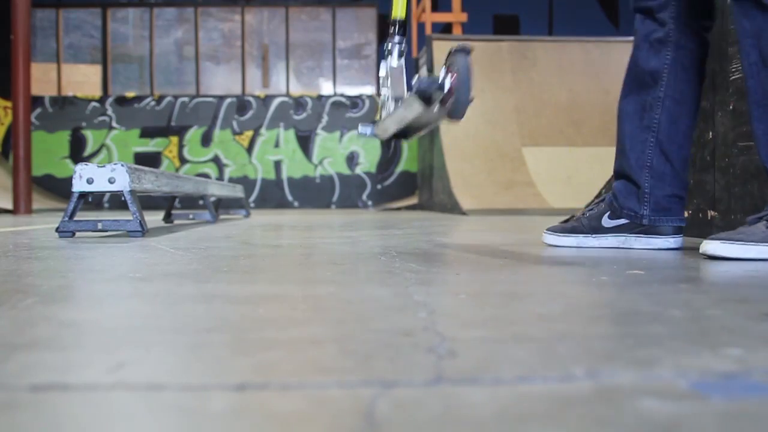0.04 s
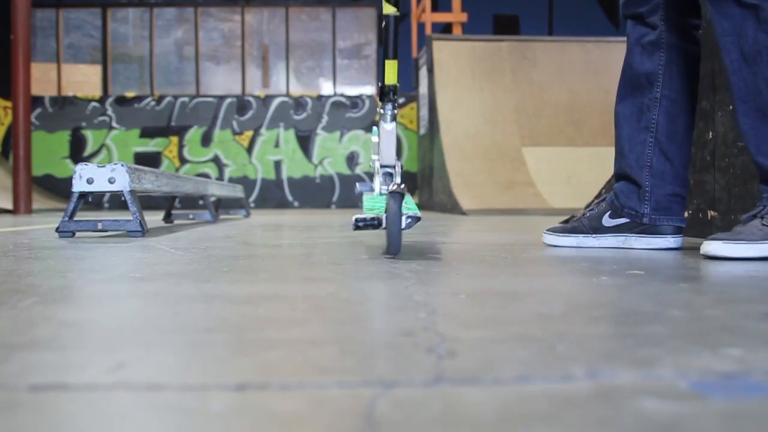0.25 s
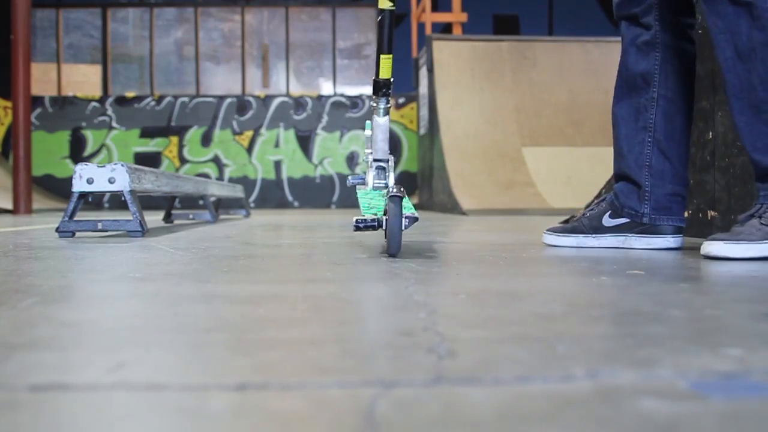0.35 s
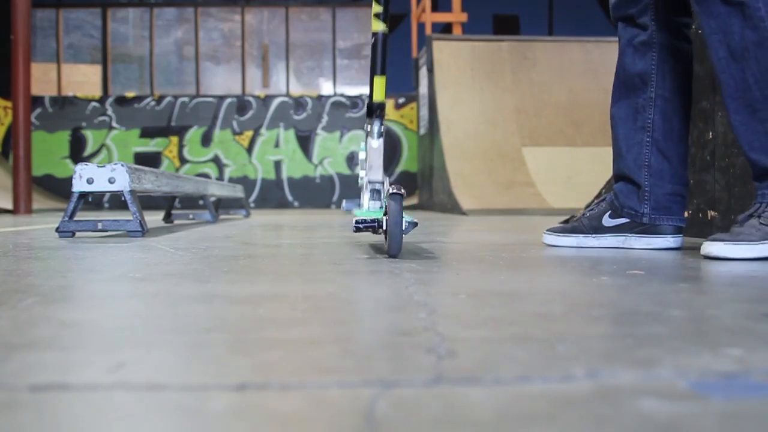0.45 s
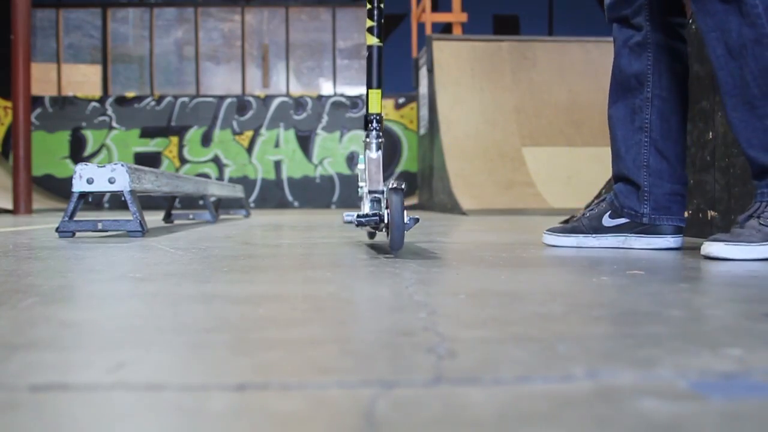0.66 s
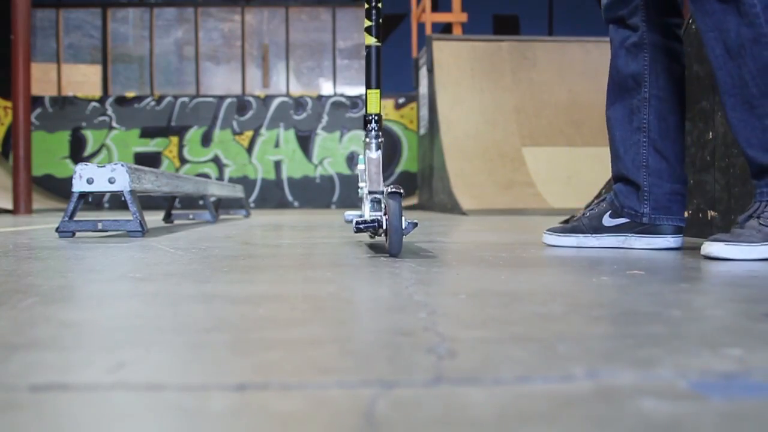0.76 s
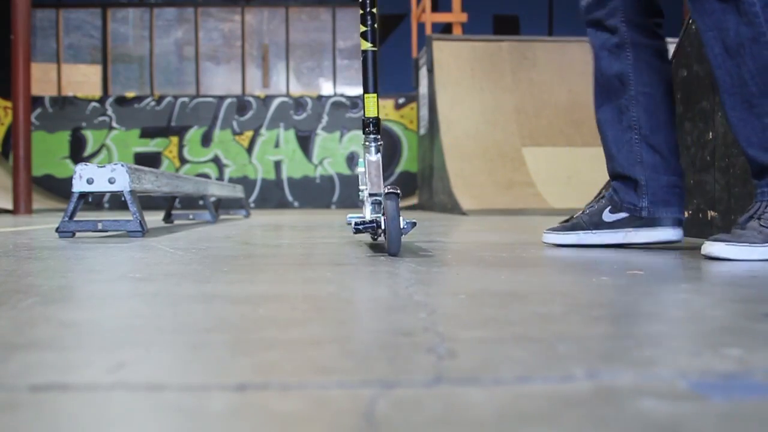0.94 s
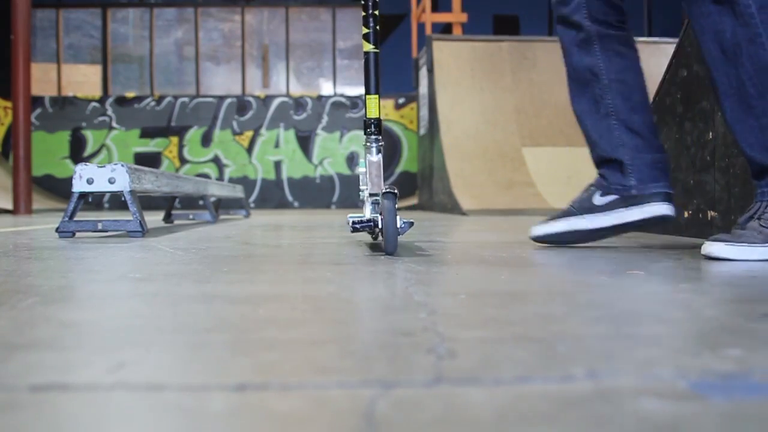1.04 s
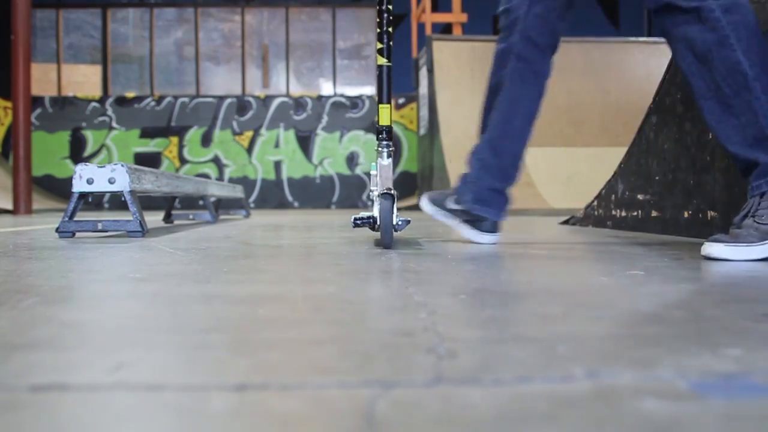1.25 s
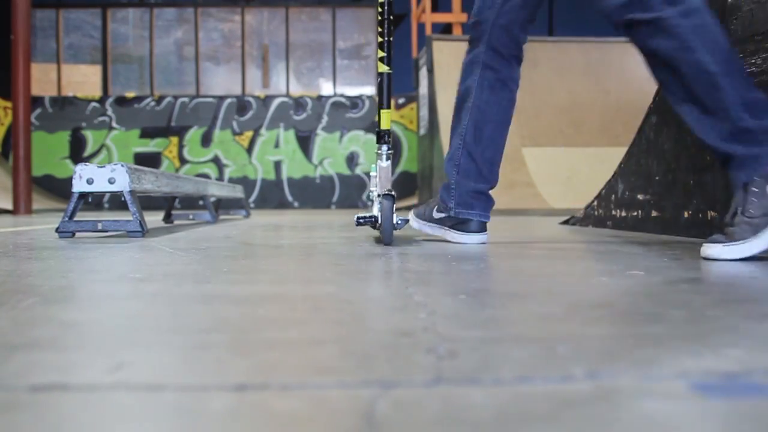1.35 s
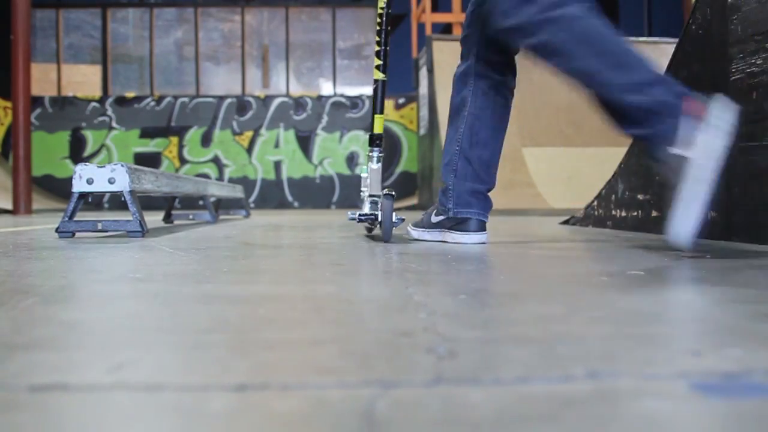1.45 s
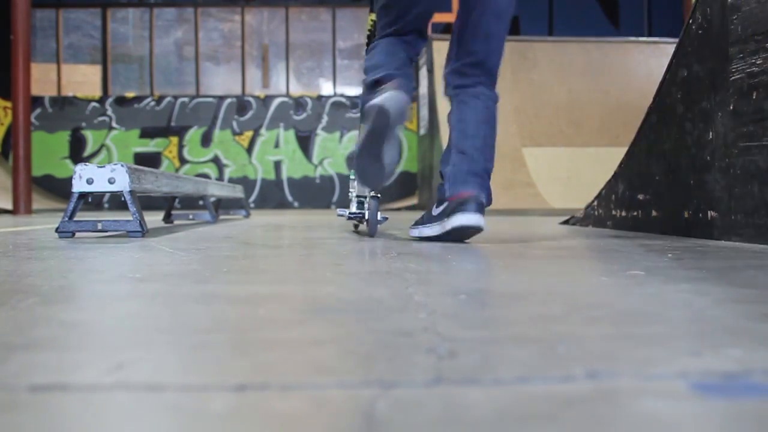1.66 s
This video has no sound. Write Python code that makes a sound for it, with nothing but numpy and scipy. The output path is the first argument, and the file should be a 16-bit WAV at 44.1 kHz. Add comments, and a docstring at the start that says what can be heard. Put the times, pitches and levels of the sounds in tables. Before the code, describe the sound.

A kick scooter drops hard onto concrete in a big hall, bounces and rattles to rest.

```python
"""A kick scooter is dropped on the concrete floor of a large hall, bounces and rattles as it settles and is moved.
Low floor thumps and their early echoes are damped tones; loose metal chatters in dense clicks and rings the frame.
Dull knocking echoes come from the hall, mostly following the blows, under a diffuse noise tail;
a small dry tick, building hum and air lie behind.
A microphone near the floor overloads on the loudest blows, and the top of the treble is cut."""
import sys
import numpy as np
from scipy import signal
from scipy.fft import rfft, irfft, next_fast_len
from scipy.io import wavfile
from scipy.ndimage import uniform_filter1d

SR = 44100
rng = np.random.default_rng(int(sys.argv[2]) if len(sys.argv) > 2 else 0)


def invert_db(x):
    """Field ratio 10**(x/20) for x, a level in decibels (scalar or array-like)."""
    u = np.asarray(x, float) / 20
    return 10 ** u


def log_audio(samples):
    """Write samples as a 16-bit WAV file to the path given in sys.argv[1]."""
    # one column per channel
    frames = np.atleast_2d(samples).T
    # limit to full scale, then quantise
    limited = np.clip(frames, -1, 1)
    pcm = np.round(limited * 32767).astype(np.int16)
    wavfile.write(sys.argv[1], SR, pcm)


N = 74970

# low floor thumps and their early echoes (time [s], envelope peak [dB], pitch [Hz])
FLOOR_THUMPS = [(.2390, 2, 112), (.2620, -6, 108), (.3050, -11, 102), (.3450, -13, 108), (.5500, -5, 118),
                (.5760, -10, 110), (.7040, -7, 118), (.755, -13, 110), (.8310, -11, 108), (.857, -16, 105),
                (.908, -19, 140), (1.03, -24, 110), (1.2440, -21, 102), (1.308, -21, 100), (1.36, -24, 95)]
# bursts of metal chatter (time [s], level before crest allowance [dB], length [s], treble gain [dB],
# frame mode struck hardest [Hz])
RATTLE_BURSTS = [(0.2415, 6.5, 0.029, 10, 545), (0.339, -1, .010, 7, 2676), (0.553, 1.5, 0.0059, 5.5, 2110),
                 (0.5835, -8, 0.0048, -2.5, 3682), (0.7088, -6.5, 0.0029, 11, 6465),
                 (0.7237, -7.5, 0.008, 0, 3150), (0.7487, -6.5, 0.0093, 8, 4538),
                 (0.754, -0.5, 0.024, 6, 2676), (0.834, -7, 0.0071, -11, 3150), (0.847, -10, 0.01, 4, 2110),
                 (0.892, -10.5, .003, -1, 8900), (0.9083, -5, .012, 5.5, 2676),
                 (0.936, -19, 0.0033, -8, 2676), (0.9682, -9, 0.0025, 0, 2110),
                 (0.9975, -8.5, .005, 3.5, 3682), (1.018, -7.5, .004, 2.5, 2676),
                 (1.045, -6.5, 0.0042, 1, 3682), (1.075, -17, 0.004, 1, 3682),
                 (1.246, -17.5, 0.0037, -2.5, 3150), (1.265, -25, 0.0054, -14, 3150),
                 (1.3045, -22.5, 0.0034, 4, 3682), (1.309, -13, 0.0063, 3, 8900),
                 (1.3165, -17, 0.0039, 0.5, 2676), (1.33, -15, 0.0094, -7, 3682),
                 (1.363, -14.5, 0.012, -8.5, 2676), (1.489, -17, 0.016, -2, 3682),
                 (1.522, -29, 0.0079, 11, 8900), (1.544, -14.5, 0.0047, -3.5, 2110),
                 (1.571, -14.5, 0.0054, 3, 3150), (1.579, -21.5, 0.033, 4.5, 3682),
                 (1.6150, -12.5, 0.0083, 5.5, 3682), (1.6500, -22, 0.011, 0.5, 3682),
                 (1.677, -17, 0.059, -0.5, 3150)]
# colour of the chatter (frequency [Hz], relative level [dB])
CHATTER_COLOUR = [(150, -25), (300, -13.5), (550, -0.5), (800, -1), (1150, 9), (1750, -3.5), (2700, 4),
                  (4500, -1), (7000, -9), (10000, -10.5), (13500, -11.5), (16000, -9)]
# ringing modes of the frame (frequency [Hz], relative level [dB], t60 [s])
FRAME_MODES = [(545, -9, .07), (1093, -7, .06), (2110, -6, .04), (2676, 0, .045), (3150, -6, .04),
               (3682, -2, .04), (4538, -4, .03), (4900, -7, .04), (5760, -8, .03), (6465, -8, .03),
               (8900, -8, .03), (13200, -10, .015)]
# dull knocking echoes from the hall, mostly following the blows (time [s], envelope peak [dB], pitch [Hz])
HALL_KNOCKS = [(.2440, -10.5, 414), (.276, -7, 1065), (.2870, -4.5, 983), (.3400, -20, 552),
               (.5530, -15.5, 554), (.5865, -7, 1032), (.7865, -9, 1100), (.8020, -9, 1094),
               (.947, -17.5, 1100), (1.050, -31.5, 550), (1.077, -15, 1100), (1.398, -23, 982),
               (1.43, -23, 1100)]
# small dry tick in the hall (time [s], envelope peak [dB], pitch [Hz])
DRY_TICKS = [(.0133, -25, 1000), (.0170, -32, 900)]
# main tail of the hall (frequency [Hz], relative level [dB], t60 [s])
HALL_TAIL = [(59, -18, 0.87), (114, -24.5, 3.24), (180, -18.5, 2.1), (248, -16.5, 4.6), (349, -2, 1.86),
             (507, -12.5, 1.25), (650, -7, 3.3), (1100, -11, 3.2), (1610, 1, 1.72), (2000, -9, 3.06),
             (2580, -12, 1.76), (4200, -10.5, 2.72), (7000, -11.5, 1.66), (9800, -11, 1.08),
             (15000, -11.5, 0.6)]
# building hum and air (frequency [Hz], relative level [dB])
AIR_COLOUR = [(15, -50), (25, -36), (39, -9.5), (60, -0.5), (86, -6.5), (186, -11), (257, -22),
              (450, -24.5), (927, -28), (2500, -40.5), (6000, -50), (15000, -55)]


def colour(x, table):
    """Filter by (frequency [Hz], level [dB]) points joined on a log-frequency axis."""
    size = next_fast_len(len(x) + 4096)
    hz = np.maximum(np.fft.rfftfreq(size, 1 / SR), 1)
    point_hz, point_db = np.array(table, float).T
    gain = invert_db(np.interp(np.log(hz), np.log(point_hz), point_db))
    return irfft(rfft(x, size) * gain, size)[:len(x)]


def unit(x):
    """Scale to rms 1."""
    return x / np.sqrt(np.mean(x ** 2))


def soft_blows(rows, rise_s):
    """Heavily damped tones whose envelopes swell for rise_s and die."""
    out, t = np.zeros(N), np.arange(N) / SR
    for start, db, hz in rows:
        since = np.maximum(t - start, 0)
        u = since / rise_s
        envelope = (u * np.exp(1 - u)) ** 2
        out += invert_db(db) * envelope * np.sin(2 * np.pi * hz * since)
    return out


def floor_thumps():
    """Low floor thumps and their early echoes: heavily damped low tones."""
    return soft_blows(FLOOR_THUMPS, 0.0067)


def loose_metal_clicks():
    """Dense random impacts of either sign, made uneven one by one and in short lumps."""
    clicks_per_s, spread_db = 16000, 3.0
    lump_s, lump_db = 0.0015, 1.8
    hits = rng.random(N) < clicks_per_s / SR
    strength = invert_db(spread_db * rng.standard_normal(N))
    clicks = unit(hits * strength * rng.choice([-1., 1.], N))
    lumps = np.repeat(rng.standard_normal(N), int(lump_s * SR))[:N]
    lumps = uniform_filter1d(lumps, 31)  # rounds the steps between lumps
    return unit(clicks * invert_db(lump_db * lumps))


def burst_envelope(since, db, length):
    """A burst rises fast, sags in level for its length, then dies away exponentially."""
    attack_s, t60_s, sag_db_per_s = 0.00091, 0.051, 134
    crest_db = 9  # allowance for peaks standing above the rms
    level = invert_db(db - crest_db - sag_db_per_s * np.clip(since, 0, length))
    attack = np.clip(since / attack_s, 0, 1)
    release = invert_db(-60 * np.maximum(since - length, 0) / t60_s)
    return level * attack * release


def frame_ring(drive):
    """Each frame mode is a damped resonator pushed by its own row of clicks."""
    frame_db = -40
    out = np.zeros(N)
    for (hz, db, t60), push in zip(FRAME_MODES, drive):
        pole = np.exp(2j * np.pi * hz / SR - np.log(1000) / (t60 * SR))
        out += invert_db(frame_db + db) * signal.lfilter([1], [1, -pole], push).imag
    return out


def rattles():
    """Loose parts chatter in bursts of clicks, heard directly and through the frame's modes."""
    treble_hz = 5500
    scatter_db, struck_db = 3.0, 13  # uneven drive of the modes, boost of the mode struck hardest
    t = np.arange(N) / SR
    clicks = loose_metal_clicks()
    plain = unit(colour(clicks, CHATTER_COLOUR))
    dull = signal.filtfilt(*signal.butter(2, treble_hz, fs=SR), plain)
    treble = plain - dull
    mode_hz = np.array(FRAME_MODES)[:, 0]
    scatter = np.clip(rng.standard_normal((len(RATTLE_BURSTS), len(FRAME_MODES))), -2, 1)
    direct, drive = np.zeros(N), np.zeros((len(FRAME_MODES), N))
    for (start, db, length, treble_db, struck_hz), row in zip(RATTLE_BURSTS, scatter):
        envelope = burst_envelope(t - start, db, length)
        direct += envelope * (dull + invert_db(treble_db) * treble)
        struck = np.abs(np.log(mode_hz / struck_hz)) < 1 / 20  # within about 5 %
        mode_gain = invert_db(scatter_db * row + struck_db * struck)
        drive += mode_gain[:, None] * envelope * clicks
    return direct + frame_ring(drive)


def hall_knocks():
    """Dull knocking echoes from the hall: short, heavily damped tones pitched above the thumps."""
    return soft_blows(HALL_KNOCKS, 0.0035)


def dry_ticks():
    """A small tick in the hall: very short damped tones, left without a tail."""
    return soft_blows(DRY_TICKS, 0.0007)


def hall(x):
    """Diffuse tail: noise in third-octave steps with its own decay in each, built up together."""
    hall_db, onset_s, build_s = -1, 0.0086, 0.017
    early_db, early_t60_s = 7, 0.55  # near walls and ramps: a stronger, faster first part of the tail
    t = np.arange(N) / SR
    point_hz, point_db, point_t60 = np.array(HALL_TAIL, float).T
    noise = rfft(rng.standard_normal(N))
    hz = np.maximum(np.fft.rfftfreq(N, 1 / SR), 1)
    tail = np.zeros(N)
    for mid in 40 * 2 ** (np.arange(27) / 3):
        # triangular bands that cross-fade into their neighbours
        weight = np.clip(1 - 3 * np.abs(np.log2(hz / mid)), 0, 1)
        band = irfft(noise * weight, N)
        db = np.interp(np.log(mid), np.log(point_hz), point_db)
        t60 = np.interp(np.log(mid), np.log(point_hz), point_t60)
        tail += band * invert_db(db - 60 * t / t60)
    tail *= 1 + invert_db(early_db - 60 * t / early_t60_s)
    build = np.clip((t - onset_s) / build_s, 0, 1)
    tail *= build * invert_db(hall_db) / np.sqrt(SR / 10)
    return signal.fftconvolve(x, tail)[:N]


def building_air():
    """Building hum and air: steady noise, heaviest in the lows."""
    return invert_db(-34.5) * unit(colour(rng.standard_normal(N), AIR_COLOUR))


def scene():
    """Thumps, chatter and knocking echoes, their hall tail, the dry tick and the building's air."""
    thump_send_db = 9.5  # the thumps feed the hall harder than they are heard directly
    thumps = floor_thumps()
    chatter_and_knocks = rattles() + hall_knocks()
    air = building_air()
    wet = hall(chatter_and_knocks + invert_db(thump_send_db) * thumps)
    return (thumps + chatter_and_knocks + wet + air + dry_ticks())[None]


def roll_off(x):
    """The treble ends steeply here."""
    return signal.sosfilt(signal.butter(12, 15620, fs=SR, output="sos"), x)


def record(dry):
    """The overloaded microphone input clips hard, then a steep low-pass cuts the top."""
    clip_db, top_hz = 1.5, 15650
    ceiling = invert_db(clip_db)
    clipped = np.clip(dry, -ceiling, ceiling)
    low_pass = signal.ellip(8, .2, 30, top_hz, fs=SR, output="sos")
    finished = signal.sosfilt(low_pass, clipped)
    return roll_off(finished)


dry = scene()
out = record(dry)
log_audio(out)
```